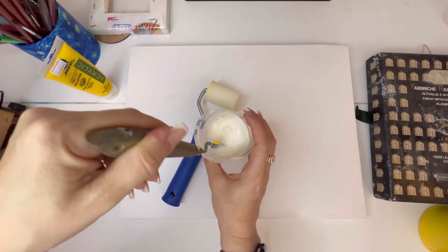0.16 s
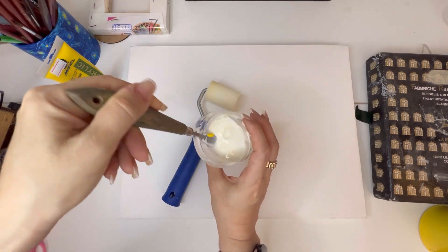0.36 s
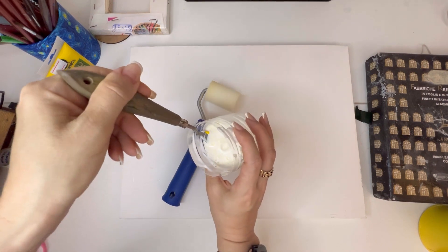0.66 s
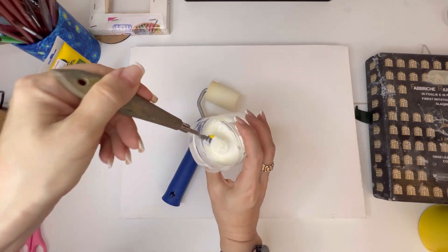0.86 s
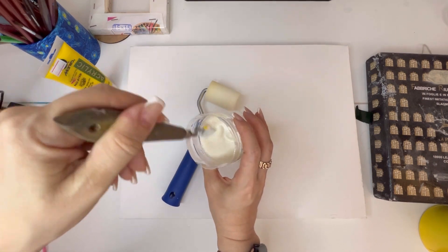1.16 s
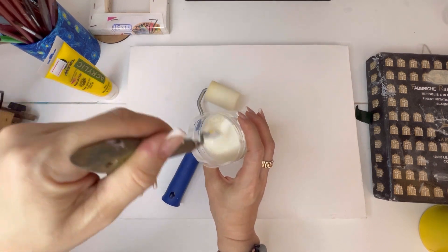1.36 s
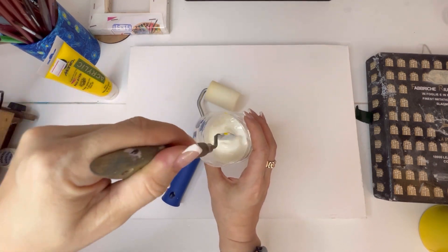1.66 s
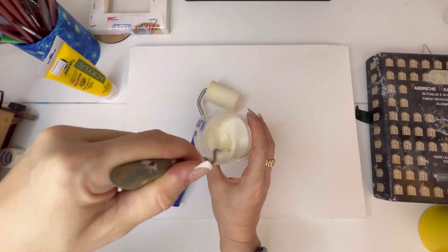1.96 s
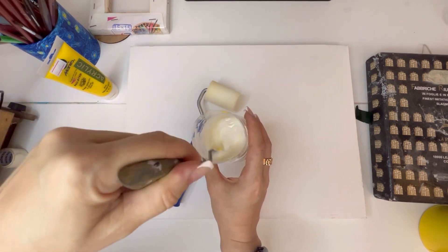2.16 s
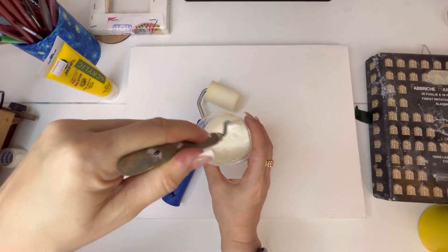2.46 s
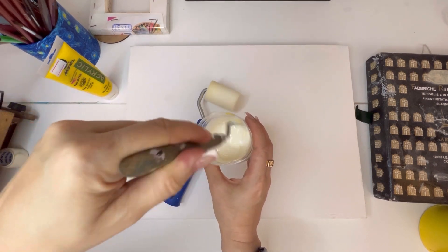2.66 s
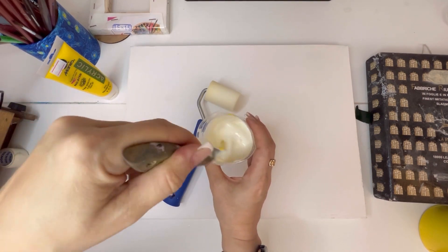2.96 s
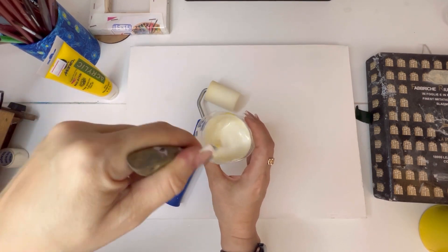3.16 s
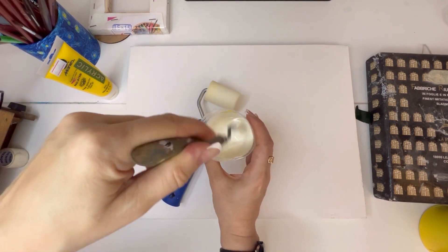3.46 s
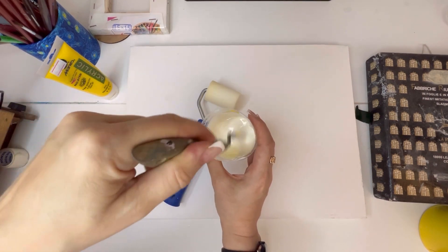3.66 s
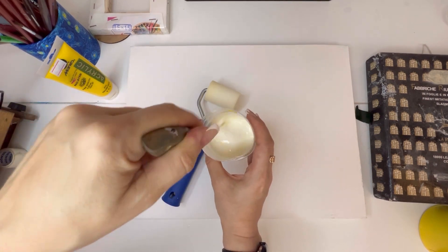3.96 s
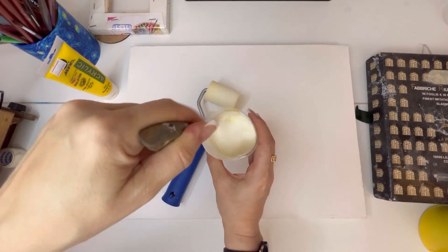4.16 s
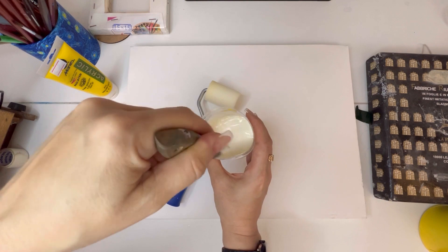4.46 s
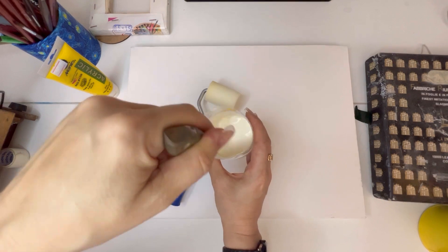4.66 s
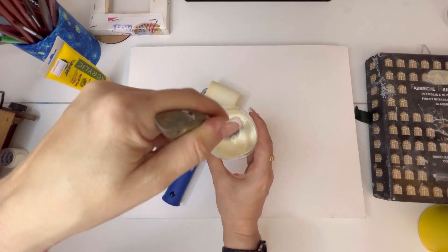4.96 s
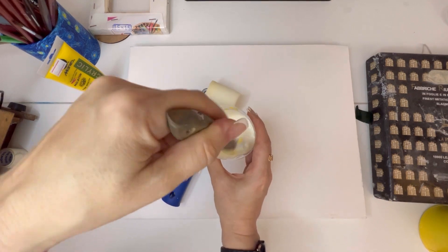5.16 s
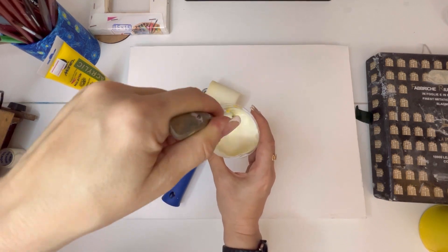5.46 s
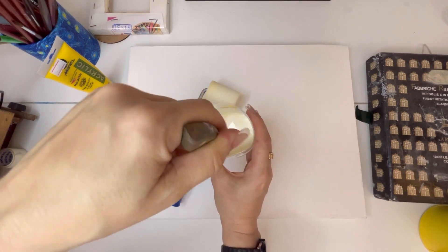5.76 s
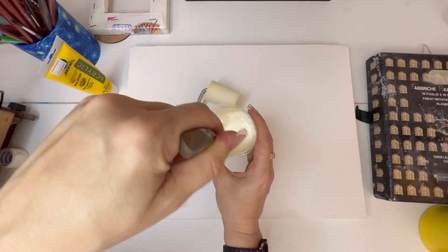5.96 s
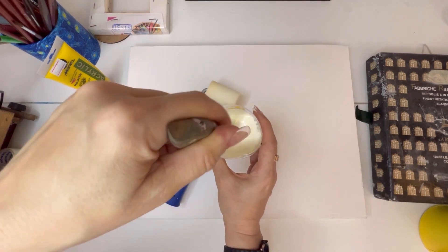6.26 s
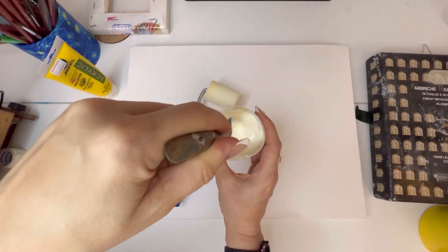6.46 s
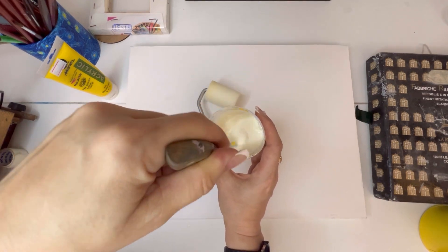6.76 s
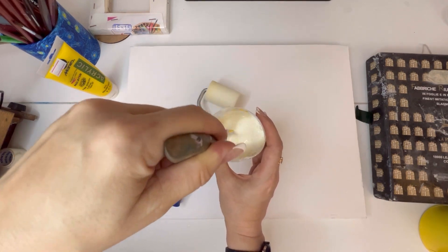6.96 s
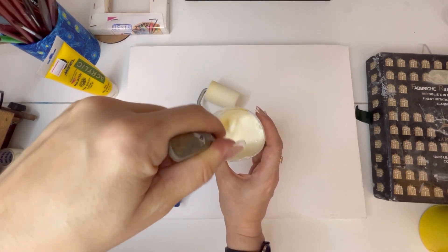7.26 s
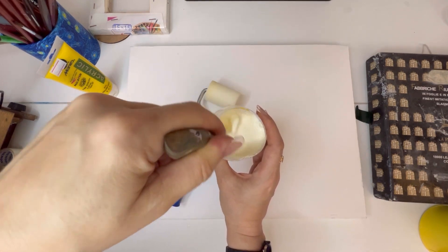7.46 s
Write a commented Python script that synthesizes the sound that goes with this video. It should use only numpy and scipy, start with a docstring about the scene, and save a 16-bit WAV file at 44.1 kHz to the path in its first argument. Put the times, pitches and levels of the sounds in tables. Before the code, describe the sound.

Close stereo microphones catch a thin metal blade knocking around a little plastic cup of thick paint. After an initial tap and a nearly quiet stretch, the stirring builds into a fast, irregular clatter with hollow ringing, crisp edge clicks, short scrapes and low wet movement, then slows to scattered soft taps. The small room answers briefly, with faint table rumble underneath.

```python
"""Close stereo take in a small quiet room: a thin steel palette knife stirs thick paint in a small plastic cup.
At the start an earlier touch dies away over room hush and table rumble, as a touch rings and cracks at once.
Sparse touches follow, with drag and room answer behind each; from about 1.5 s they grow stronger and denser.
From about 2 to 6 s the stirring is fast: the blade skips between touches, paint sloshes and the cup thuds.
Then it slackens to weaker, sparser touches. Rings are swelling sines; cracks, drag and slosh are shaped noise."""
import sys
import numpy as np
from scipy import signal
from scipy.fft import rfft, irfft, next_fast_len
from scipy.io import wavfile
from scipy.ndimage import uniform_filter1d, map_coordinates

SR = 44100
rng = np.random.default_rng(int(sys.argv[2]) if len(sys.argv) > 2 else 0)


def store_wav(level_fs):
    """Save 16-bit WAV to argv[1]."""
    pcm = np.round(np.clip(np.atleast_2d(level_fs), -1, 1) * 32767)
    wavfile.write(sys.argv[1], SR, pcm.T.astype(np.int16))


N = 335601

# room sound left by a touch before the start: [f/Hz, relative level per Hz/dB]
EARLIER_TOUCH = [(180, -48), (300, -21.5), (1080, -11), (1420, -5), (1570, -16), (3860, -14.5),
                 (15000, -50.5)]
# room hush: [f/Hz, relative level per Hz/dB]
ROOM_HUSH = [(100, -3), (200, -4.5), (480, -22), (800, -13), (1250, -10), (2500, -13.5), (8500, -18.5),
             (11000, -37.5), (16000, -55.5)]
# clear touches of blade on cup: [t/s, relative ring level/dB, ring f/Hz, edge crack level/dB]
TOUCHES = [(-0.004, -22, 1320, -43.5), (0.1575, -40.5, 1260, -71.5), (0.22, -66, 1160, -69.5),
           (0.2477, -47.5, 1256, -71.5), (0.345, -42, 1200, -79), (0.4226, -59.5, 1250, -90),
           (0.5284, -92, 1260, -71.5), (0.6758, -44, 1250, -58), (0.8009, -50.5, 1260, -72.5),
           (0.8192, -52, 1420, -72), (0.8317, -43.5, 1230, -62), (0.9476, -31, 1200, -55),
           (1.018, -27.5, 1264, -51), (1.0328, -37, 1340, -59.5), (1.2132, -44, 1280, -64.5),
           (1.4655, -43, 1400, -38.5), (1.5964, -31, 1380, -42), (1.64, -25.5, 1310, -49),
           (1.7429, -24.5, 1230, -42.5), (1.7557, -31, 1240, -46), (1.7777, -32, 1340, -54),
           (1.804, -38, 1320, -44), (1.8716, -30.5, 1313, -31.5), (1.9628, -28.5, 1180, -43),
           (2.0655, -35.5, 1250, -50.5), (2.078, -32.5, 1330, -52.5), (2.105, -33.5, 1240, -45),
           (2.136, -30, 1330, -47.5), (2.1545, -23.5, 1290, -40.5), (2.1717, -20, 1262, -38.5),
           (2.1818, -21.5, 1316, -43), (2.214, -41.5, 1250, -42), (2.2688, -30, 1230, -40.5),
           (2.289, -24, 1250, -40), (2.317, -31, 1220, -45), (2.364, -27, 1240, -54),
           (2.3823, -23.5, 1320, -42), (2.412, -23, 1420, -35.5), (2.4195, -21.5, 1350, -36.5),
           (2.4684, -33.5, 1470, -44), (2.4743, -27.5, 1230, -57.5), (2.508, -30, 1260, -37.5),
           (2.5213, -27.5, 1340, -47.5), (2.5643, -23.5, 1280, -43.5), (2.5948, -29.5, 1246, -55),
           (2.6803, -24.5, 1224, -42), (2.699, -30.5, 1300, -43), (2.7123, -27, 1260, -39.5),
           (2.731, -30, 1230, -61.5), (2.7652, -23.5, 1260, -37.5), (2.7806, -24, 1310, -44.5),
           (2.7894, -21, 1277, -41), (2.878, -50, 1270, -43.5), (2.8954, -32, 1170, -41),
           (2.901, -27.5, 1290, -43.5), (2.946, -23, 1287, -30.5), (2.9702, -25.5, 1170, -39),
           (2.987, -27, 1204, -37.5), (3.0166, -35, 1260, -50.5), (3.094, -24.5, 1270, -38),
           (3.1233, -21, 1260, -32), (3.1744, -29, 1360, -42), (3.1934, -25.5, 1270, -35.5),
           (3.2169, -35, 1325, -49.5), (3.283, -21.5, 1240, -46.5), (3.3303, -26, 1260, -35.5),
           (3.3634, -24.5, 1290, -37.5), (3.3831, -30, 1220, -40), (3.4023, -36.5, 1290, -47.5),
           (3.435, -29, 1260, -42), (3.4966, -27.5, 1270, -32), (3.5377, -22, 1300, -38.5),
           (3.5533, -18.5, 1290, -42), (3.5858, -25, 1260, -41.5), (3.5963, -23, 1215, -41),
           (3.618, -24, 1330, -46.5), (3.6535, -37.5, 1340, -51), (3.7322, -27.5, 1214, -44.5),
           (3.7772, -30, 1340, -44), (3.7857, -20, 1330, -31.5), (3.817, -23, 1300, -39.5),
           (3.832, -27, 1270, -47), (3.9169, -31.5, 1250, -35), (3.951, -29, 1260, -43),
           (3.9862, -26, 1340, -28), (4.0157, -26, 1290, -35.5), (4.0353, -25.5, 1370, -36),
           (4.077, -32.5, 1400, -42), (4.1408, -22, 1295, -50.5), (4.1547, -29.5, 1220, -45.5),
           (4.1854, -20, 1362, -24.5), (4.228, -30, 1320, -39), (4.246, -25.5, 1240, -45.5),
           (4.2604, -26.5, 1430, -37), (4.2903, -33, 1270, -45), (4.3248, -16.5, 1260, -38),
           (4.3397, -39.5, 1260, -39), (4.3807, -25, 1310, -39.5), (4.4127, -26.5, 1270, -24.5),
           (4.4506, -23.5, 1235, -39.5), (4.4706, -23.5, 1266, -38.5), (4.5075, -34.5, 1320, -46),
           (4.5544, -26.5, 1267, -37.5), (4.5791, -23, 1298, -44.5), (4.5946, -32, 1210, -44.5),
           (4.6301, -23.5, 1350, -24.5), (4.6597, -32, 1340, -43), (4.6819, -23, 1163, -31.5),
           (4.6931, -26.5, 1360, -34), (4.726, -32, 1270, -41.5), (4.7688, -24, 1260, -36.5),
           (4.804, -26.5, 1350, -46), (4.822, -28, 1260, -47), (4.8602, -23.5, 1400, -27),
           (4.8934, -25, 1210, -33.5), (4.9082, -27.5, 1310, -41), (4.943, -33.5, 1300, -45.5),
           (4.997, -24.5, 1246, -40.5), (5.0265, -24, 1260, -39.5), (5.0747, -26, 1360, -24.5),
           (5.1115, -26.5, 1274, -39), (5.1716, -32, 1275, -43), (5.218, -25.5, 1230, -28),
           (5.246, -26, 1193, -48), (5.264, -32.5, 1240, -46.5), (5.2966, -26.5, 1310, -25),
           (5.352, -26.5, 1290, -52), (5.368, -27, 1300, -46.5), (5.4404, -26, 1270, -24.5),
           (5.459, -25, 1260, -43.5), (5.496, -39, 1340, -40), (5.5212, -26, 1260, -27.5),
           (5.573, -24, 1274, -51.5), (5.6196, -50.5, 1290, -43.5), (5.6431, -26, 1280, -25),
           (5.6874, -26, 1306, -48), (5.7229, -26.5, 1380, -22.5), (5.785, -24, 1270, -45.5),
           (5.8028, -25, 1290, -42.5), (5.813, -29.5, 1340, -46.5), (5.8259, -16, 1283, -46.5),
           (5.912, -20.5, 1280, -38), (5.9234, -19.5, 1290, -30.5), (5.9965, -31.5, 1360, -39),
           (6.0095, -32.5, 1200, -52), (6.1243, -28.5, 1250, -50), (6.1839, -30.5, 1290, -54.5),
           (6.2082, -31, 1260, -40.5), (6.2184, -29.5, 1240, -46.5), (6.3769, -31.5, 1244, -51.5),
           (6.3877, -30.5, 1203, -49), (6.3978, -36, 1220, -48), (6.5695, -29.5, 1215, -44.5),
           (6.582, -31.5, 1244, -42.5), (6.6764, -47.5, 1265, -72), (6.762, -33.5, 1293, -59.5),
           (6.8534, -48.5, 1250, -57), (6.9028, -31, 1160, -51.5), (6.9601, -41.5, 1280, -80),
           (7.091, -40, 1300, -56.5), (7.1045, -40.5, 1240, -49), (7.1155, -32, 1230, -45.5),
           (7.235, -42, 1190, -62.5), (7.2651, -28.5, 1330, -54), (7.312, -32, 1200, -46.5),
           (7.4166, -47.5, 1295, -50.5), (7.433, -39.5, 1270, -61.5), (7.5697, -41.5, 1630, -39)]
# resonances of the cup wall: [f/Hz, width f/Hz, relative level/dB]
WALL_MODES = [(702, 110, 0.5), (1950, 640, -0.5), (2580, 220, 3), (3116, 530, -2.5), (3872, 460, -0.5)]
# resonances of the blade edge: [f/Hz, width f/Hz, relative level/dB]
EDGE_MODES = [(4725, 960, 2.5), (5920, 810, 8), (7230, 840, 5), (7785, 1040, 4), (10200, 3500, -4),
              (13700, 5000, -13.5)]
# blade sliding on the wall: [f/Hz, relative level per Hz/dB]
DRAG_SPECTRUM = [(500, -23.5), (1000, -5.5), (1290, 3), (1700, -11), (4000, -16), (6000, -19.5),
                 (10000, -39.5), (16000, -49)]
# course of the stirring: [t/s, table rumble level/dB, relative push on the paint level/dB]
STROKES = [(0, -74, -77.5), (.15, -81, -83), (1.5, -78, -89), (2.1, -77.5, -71), (3.3, -77.5, -71.5),
           (5.8, -75, -72.5), (6.25, -81.5, -72), (6.5, -80, -84.5), (6.9, -79.5, -80), (7.15, -70, -75),
           (7.6, -71, -88.5)]
# table rumble: [f/Hz, relative level per Hz/dB]
TABLE_RUMBLE = [(20, -34), (45, -5), (120, -5), (300, -41)]
# paint and soft cup: [f/Hz, relative level per Hz/dB]
PAINT_SLOSH = [(120, -12), (330, 1), (640, 5.5), (1100, -27)]
# left-right likeness of noise and cracks: [f/Hz, correlation]
LIKENESS = [(60, 0.38), (270, .85), (650, 0.38), (1220, 0.84), (2010, 0.98), (3880, 0.44), (5800, 0.069),
            (8010, 0.62), (9000, 0), (15000, 0)]
# decay of the room by 60 dB: [f/Hz, decay t/s]
ROOM_DECAY = [(250, 0.51), (1300, 0.19), (4000, 0.28), (12000, 0.13)]
# strength of the room answer: [f/Hz, relative level/dB]
ROOM_LEVEL = [(250, -3.5), (1300, -16.5), (2500, -10), (4000, -11), (12000, -10.5)]
# dull thuds of the cup in the hand: [t/s, peak level/dB, f/Hz]
THUDS = [(2.185, -43, 323), (2.427, -39, 269), (2.515, -38, 260), (2.947, -41, 379), (3.13, -44.5, 360),
         (3.335, -38.5, 339), (3.737, -42, 350), (4.19, -43.5, 442), (4.471, -40.5, 430), (4.63, -43, 350),
         (5.029, -36.5, 306), (5.076, -41.5, 400), (5.297, -39.5, 380), (5.725, -41.5, 372),
         (5.829, -40.5, 308)]

EARLIER_DB, EARLIER_T60_S = -48.5, 0.22
# crack level over ring level, for a touch with no snap and with full snap
SOFT_DB, HARD_DB = -23, -0.5
# the wall knock lies between ring and crack; share of the crack
KNOCK_DB, KNOCK_SHARE, KNOCK_SCATTER_DB = -4.5, 0.4, 1
# fast stirring; time aimed for between skips; from this gap on the blade counts as lifted
FAST_FROM_S, FAST_TO_S, SKIP_S, LIFT_S = 2.05, 5.9, 0.019, 0.052
# skip ring over the weaker neighbouring touch; skip crack over skip ring
SKIP_DB, SKIP_CRACK_DB, SKIP_SCATTER_DB = -12, -16.5, 3
SKIP_RING_HZ, SKIP_RING_SCATTER_HZ = 1223, 70
TOP_HZ = 16700


def amp(db):
    """dB to gain."""
    return 10 ** (np.asarray(db) / 20)


def unit(x):
    """x at rms 1."""
    return x / np.sqrt(np.mean(x ** 2) + 1e-20)


def along(points, hz):
    """A table of (f/Hz, value) read along a log frequency axis."""
    f, value = np.transpose(points)
    return np.interp(np.log(hz + 1), np.log(f + 1), value)


def stroke_curve(column):
    """One column of the stirring, in dB, for every sample."""
    rows = np.array(STROKES)
    return np.interp(np.arange(N) / SR, rows[:, 0], rows[:, column])


def wobble(rate):
    """A smooth random curve, rate knots a second."""
    knots = rng.standard_normal(int(N * rate / SR) + 4)
    return map_coordinates(knots, [np.arange(N) * rate / SR])


def filtered(x, response):
    """x times a response of frequency."""
    m = next_fast_len(N + SR // 2)
    return irfft(rfft(x, m) * response(np.fft.rfftfreq(m, 1 / SR)), m)[..., :N]


def spread(pair, hz):
    """Two spectra mixed as mid and side, so that unrelated ones gain the tabled left-right likeness."""
    turn = np.arccos(np.clip(along(LIKENESS, hz), -1, 1)) / 2
    mid = pair[0] * np.cos(turn)
    side = pair[1] * np.sin(turn)
    return np.array([mid + side, mid - side])


def rush(spectrum, lumps):
    """Stereo noise of rms 1, lumped in time and then coloured."""
    m = next_fast_len(N)
    hz = np.fft.rfftfreq(m, 1 / SR)
    noise = rfft(lumps * rng.standard_normal((2, N)), m)
    coloured = noise * amp(along(spectrum, hz))
    return unit(irfft(spread(coloured, hz), m)[:, :N])


def placed(s, sound):
    """Rows of stereo sound laid out at their times."""
    where = (np.round(s * SR).astype(int) + np.arange(sound.shape[-1])).ravel()
    heard = where >= 0
    return np.array([np.bincount(where[heard], side.ravel()[heard], N)[:N] for side in sound])


def recent_level(x, hold_s):
    """Rms level of x with a memory that fades over hold_s: how hard the blade has lately met the wall."""
    keep = np.exp(-1 / (hold_s * SR))
    return np.sqrt(signal.lfilter([1 - keep], [1, -keep], x ** 2))


def earlier_touch():
    """The room still dying away after a touch before the start: noise with a steady decay."""
    fall_db = -60 * np.arange(N) / SR / EARLIER_T60_S
    return amp(EARLIER_DB + fall_db) * rush(EARLIER_TOUCH, 1)


def hush():
    """The quiet room: steady coloured noise."""
    return amp(-82.5) * rush(ROOM_HUSH, 1)


def cup_ring(db, hz, hard, luck, t):
    """The air of the cup swells within a few cycles and dies fast, with a weaker neighbour mode above it."""
    # a harder touch swells sooner
    swell = t / ((0.0036 - 0.00076 * hard) * np.exp(0.43 * luck[:, :1]))
    shell = swell ** 2.77 * np.exp(3.76 * (1 - swell))
    main = shell * np.sin(2 * np.pi * (hz * t + luck[:, 1:2]))
    second_shell = amp(-3.0) * amp(-60 * t / 0.017) * (1 - np.exp(-t / 0.0039))
    second = second_shell * np.sin(2 * np.pi * (1.17 * hz * t + luck[:, 2:3]))
    # the neighbour differs from left to right; both share the ring's level
    second_sides = np.array([1.3, -0.4])[:, None, None]
    return amp(db - 2.15) * (main + second_sides * second)


def rattle(modes, count, burst_s, scatter_db, lag_s, snap, twist, size=2048):
    """Stereo contact bursts of level near 1 through the modes, at new strengths and from slightly new spots."""
    t, hz = np.arange(size) / SR, np.fft.rfftfreq(size, 1 / SR)
    luck = rng.standard_normal((count, 2 + len(modes)))
    life = burst_s * np.exp(0.35 * luck[:, :1])
    shell = amp(-60 * t / life) * (1 - np.exp(-t / 0.00047)) ** 2
    grit = rng.standard_normal((count, size)) * shell
    # one sharp snap where steel meets the wall, about 1 ms in
    burst = rfft(grit) + snap * np.exp(-2j * np.pi * hz * 0.0009834)
    # the side part is the same burst by another path, turned in phase at the microphone ports
    late = burst * np.exp(-2j * np.pi * (twist + hz * lag_s * luck[:, 1:2]))
    shapes = []
    for k, (centre, width, db) in enumerate(modes):
        damping = 1j * hz * width
        shapes.append((-1) ** k * amp(db) * damping / (centre ** 2 - hz ** 2 + damping))
    strengths = amp(scatter_db * luck[:, 2:])
    out = irfft(spread([burst, late], hz) * (strengths @ np.array(shapes)), size)
    # level: the strongest 2 ms of the middle
    power = np.abs(uniform_filter1d(out.mean(axis=0) ** 2, size=88))
    return out / np.sqrt(power.max(axis=1, keepdims=True))


def touches(size=2048):
    """Each contact rings the air of the cup while wall and blade edge crack."""
    s, db, hz, edge_db = np.vstack([TOUCHES, skips()]).T[:, :, None]
    t, count = np.arange(size) / SR, len(s)
    luck = rng.standard_normal((count, 4))
    crack_over_ring = edge_db - db
    wall_db = db + KNOCK_SHARE * crack_over_ring + KNOCK_DB + KNOCK_SCATTER_DB * luck[:, 3:]
    hard = np.clip((crack_over_ring - SOFT_DB) / (HARD_DB - SOFT_DB), 0, 1)
    ring = cup_ring(db, hz, hard, luck, t)
    # twist in turns
    wall = rattle(WALL_MODES, count, burst_s=0.026, scatter_db=3.0, lag_s=0.0006, snap=4.5 * hard, twist=0)
    edge = rattle(EDGE_MODES, count, burst_s=0.021, scatter_db=1.4, lag_s=0.000005, snap=7 * hard, twist=0.25)
    return placed(s, ring + amp(wall_db) * wall + amp(edge_db) * edge)


def drag(knocks):
    """The blade slips along the wall: after each touch and, by the push on the paint, on the way in."""
    mid = knocks.mean(axis=0)
    grit = rush(DRAG_SPECTRUM, amp(5.53 * wobble(120) + 4.24 * wobble(400)))
    after = amp(-7.0) * recent_level(mid, hold_s=0.0041)
    # run backwards, the level rises ahead of the touch
    before = recent_level(mid[::-1], hold_s=0.0023)[::-1]
    return (after + amp(stroke_curve(2) + 59.5) * before) * grit


def table_rumble():
    """The push shakes the table: slowly wavering low noise that follows the stirring."""
    return amp(stroke_curve(1)) * rush(TABLE_RUMBLE, amp(2 * wobble(6)))


def paint_slosh(knocks):
    """Pushed paint sloshes in the soft cup: lumpy noise that follows touches and push."""
    push = recent_level(knocks.mean(axis=0), hold_s=0.006) ** 0.68
    return amp(stroke_curve(2) + 45.5) * push * rush(PAINT_SLOSH, amp(3.5 * wobble(40)))


def room(x, size=8192):
    """Each stretch of sound gets its own noise tail as answer; every frequency dies at its own speed."""
    out = np.zeros((2, N + size + SR))
    wet = filtered(x.mean(axis=0), lambda hz: amp(along(ROOM_LEVEL, hz)))
    for start in range(0, N, size):
        hz, t, z = signal.stft(rng.standard_normal((2, SR // 3)), SR, nperseg=256)
        decay = amp(-60 * t / along(ROOM_DECAY, hz)[:, None])
        mid, side = signal.istft(z * decay, SR, nperseg=256)[1]
        tail = np.array([mid + side, mid - side])
        tail = tail / np.linalg.norm(tail[0])
        part = signal.fftconvolve(wet[None, start:start + size], tail, axes=1)
        # the answer sets in 200 samples (4.5 ms) later
        out[:, start + 200:][:, :part.shape[1]] += part
    return out[:, :N]


def skips():
    """In fast stirring the blade skips once or twice, at a nearly even pace, where touches leave room."""
    rows = np.array(TOUCHES)
    inside = (rows[:-1, 0] > FAST_FROM_S) & (rows[:-1, 0] < FAST_TO_S)
    first, then = rows[:-1][inside], rows[1:][inside]
    gap, nth = then[:, 0] - first[:, 0], np.array([[1], [2]])
    count = np.clip(np.round(gap / SKIP_S) - 1, 0, 2) * (gap < LIFT_S)
    luck = rng.standard_normal((4, 2, len(gap)))
    s = first[:, 0] + gap * nth / (count + 1) + 0.0026 * luck[0]
    weaker_db = np.minimum(first[:, 1], then[:, 1])
    # unused places are silenced
    db = np.where(nth <= count, weaker_db + SKIP_DB + SKIP_SCATTER_DB * luck[1], -150)
    hz = SKIP_RING_HZ + SKIP_RING_SCATTER_HZ * luck[2]
    crack_db = db + SKIP_CRACK_DB + SKIP_SCATTER_DB * luck[3]
    return np.reshape([s, db, hz, crack_db], (4, -1)).T


def cup_thuds(size=2048):
    """The soft cup thuds in the hand: a low sine swells and dies in a few cycles."""
    s, db, hz = np.transpose(THUDS)[:, :, None]
    t = np.arange(size) / SR
    swell = t / 0.0033
    # start phase in turns, nearly the same left and right
    turn = rng.random((len(THUDS), 1))
    turn = turn + 0.023 * rng.standard_normal((len(THUDS), 2)).T[:, :, None]
    tone = np.sin(2 * np.pi * (hz * t + turn))
    return placed(s, amp(db) * swell * np.exp(1 - swell) * tone)


def scene():
    """Blade and cup with the room's answer, over paint, table and hush."""
    knocks = touches()
    near = knocks + drag(knocks)
    blade = near + room(near)
    fading = earlier_touch()
    low = cup_thuds() + paint_slosh(knocks) + table_rumble()
    return blade + fading + low + hush()


def record(dry):
    """The microphone thins the deepest bass, below about 35 Hz, and keeps nothing above its band limit."""
    return filtered(dry, lambda hz: (hz < TOP_HZ) * hz ** 2 / (hz ** 2 + 35 ** 2))


dry = scene()
out = record(dry)
store_wav(out)
```